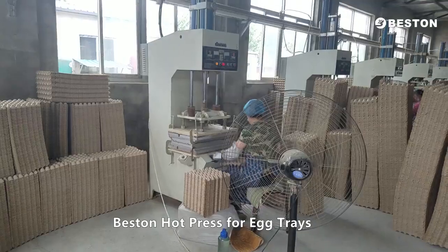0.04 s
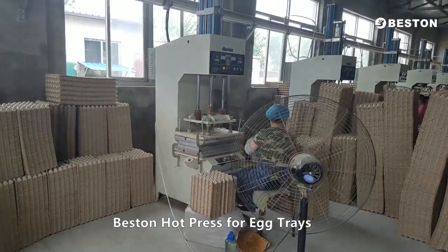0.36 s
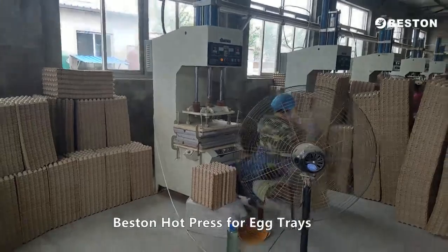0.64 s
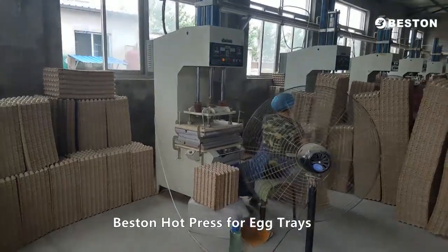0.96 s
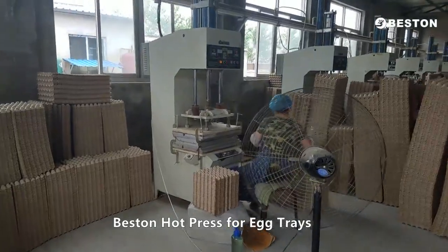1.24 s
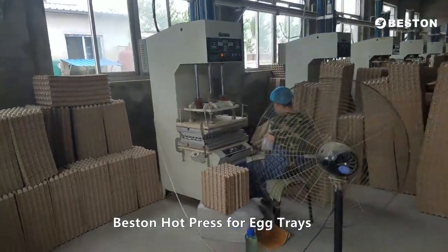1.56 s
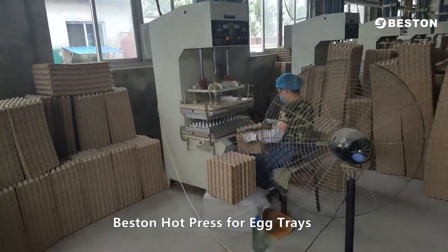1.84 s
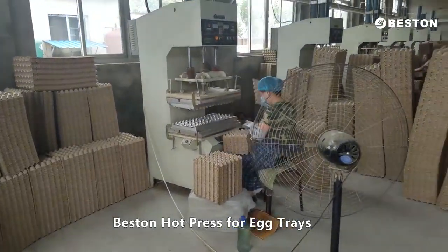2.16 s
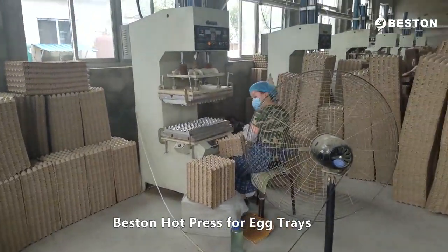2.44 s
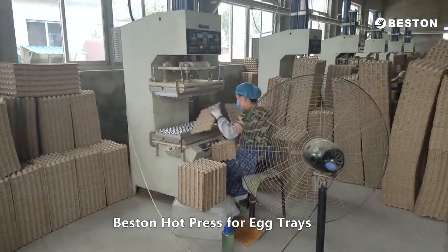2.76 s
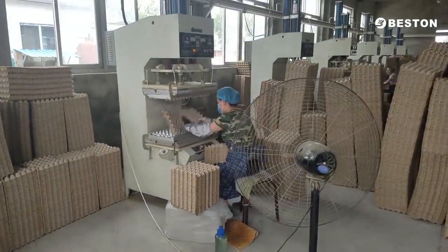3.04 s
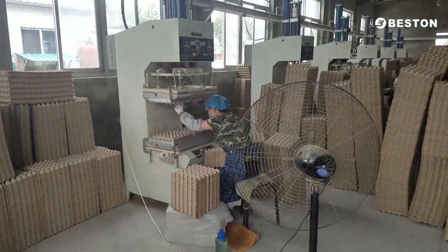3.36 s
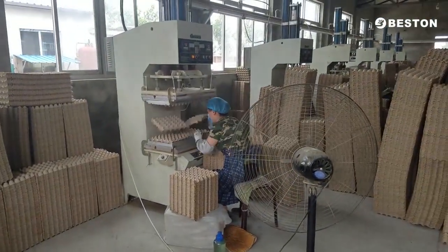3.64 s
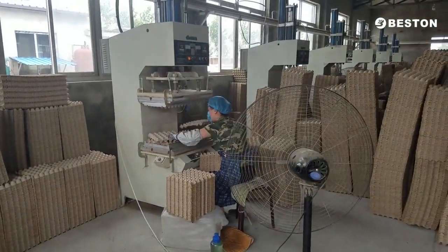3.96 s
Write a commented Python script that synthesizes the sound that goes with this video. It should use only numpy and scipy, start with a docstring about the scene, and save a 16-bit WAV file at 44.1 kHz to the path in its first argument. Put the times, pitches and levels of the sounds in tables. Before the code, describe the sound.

A pneumatic press lets out three loud hissing blasts of air, the later two whistling slightly. Its moulds thud and clunk now and then, blurred by a factory hall, over steady machinery rumble and a humming floor fan.

```python
"""A pneumatic hot press lets out three hissing blasts of air in a factory hall.
Each jet sags and dulls as its pressure drains; the outlet rings, and whistles where air catches an edge.
The press thuds and its moulds clunk now and then, blurred by the hall.
Underneath, machinery rumbles, motors and a large floor fan hum, and a draught puffs early on."""
import sys
import numpy as np
from scipy import signal
from scipy.fft import rfft, irfft
from scipy.io import wavfile

SR = 44100
rng = np.random.default_rng(int(sys.argv[2]) if len(sys.argv) > 2 else 0)


def output_pcm(signal):
    """Save a mono or channel-first signal as 16-bit PCM at the path in sys.argv[1].

    Samples are clipped to [-1, 1] before scaling.
    """
    pcm = np.clip(np.atleast_2d(signal).T, -1, 1) * 32767
    wavfile.write(sys.argv[1], SR, np.round(pcm).astype(np.int16))


N = 176400
TIME, FREQS = np.arange(N) / SR, np.maximum(np.arange(N // 2 + 1) * SR / N, 1)
CUTOFF_HZ = 15850


def from_db(db):
    """Decibels to gain."""
    return 10 ** (np.asarray(db) / 20)


def unit_power(x):
    """Scale to an RMS of one."""
    return x / np.sqrt(np.mean(x ** 2) + 1e-20)


def curve(points):
    """Join breakpoints into a curve over log frequency."""
    hz, values = np.transpose(points)
    return np.interp(np.log(FREQS), np.log(hz), values)


def drift(rate_hz):
    """A smooth random modulator of unit power."""
    return unit_power(irfft(rfft(rng.standard_normal(N)) / (1 + (FREQS / rate_hz) ** 2), N))


def swell(start, attack, end, decay):
    """Linear attack, hold, exponential tail."""
    return np.clip((TIME - start) / attack, 0, 1) * np.exp(-np.maximum(TIME - end, 0) / decay)


def arch(start, end):
    """A rounded fade in and out."""
    return np.sqrt(np.maximum(1 - (2 * (TIME - start) / (end - start) - 1) ** 2, 0))


def flutter(x, depth_db, rate_hz):
    """Each octave band wavers in level on its own."""
    spectrum, octave = rfft(x), np.clip(np.log2(FREQS / 80), 0, 7)
    bands = (irfft(spectrum * np.maximum(1 - abs(octave - k), 0), N) for k in range(8))
    return sum(band * from_db(depth_db * drift(rate_hz)) for band in bands)


def tone(hz, waver_hz, waver_db, rate_hz):
    """A sine of unit power that wanders in pitch and level."""
    phase = 2 * np.pi * np.cumsum(hz + waver_hz * drift(rate_hz)) / SR
    return unit_power(np.sin(phase) * from_db(waver_db * drift(rate_hz)))


# Stereo image of the hall. Each row: frequency in Hz, left-right correlation.
HALL_CORRELATION = [(60, 1), (200, 1), (380, 0.96), (700, 0.67), (1100, .28), (1650, -0.078), (2500, 0.18),
                    (3500, -0.061), (15000, 0.089)]


def hall_noise(colour_db):
    """Coloured stereo noise of unit power, centred in the bass and diffuse above."""
    mid, side = rfft(rng.standard_normal((2, N)))
    alike = np.clip(curve(HALL_CORRELATION), -.99, .99)
    stereo = np.sqrt(1 + alike) * mid + np.sqrt(1 - alike) * side * [[1], [-1]]
    return unit_power(irfft(stereo * from_db(colour_db) * (FREQS < CUTOFF_HZ), N))


# Air blasts. Each row: valve opening, closing and release in seconds, level in dB, then attack in
# seconds, sag in dB and sag time in seconds for the low rush, and the same three for the high sizzle.
AIR_BLASTS = [(0, 1.007, .08, -16, 0.23, 11, 1.17, 0.17, 13.5, 0.72),
              (0.971, 2.822, 0.086, -13.5, 0.1, 16.5, 2.72, 0.08, 15.5, 1),
              (3.207, 4.1, .07, -13.5, 0.05, 1, 0.26, 0.057, 6, 0.28)]
# EQ of each blast. Each row: frequency in Hz, relative level in dB.
FIRST_EQ = [(600, -21), (1000, -10.5), (1600, -7), (2100, -6.5), (3100, -4), (3700, -5.5), (4300, -9.5),
            (5400, -8.5), (6800, -11), (8200, -10), (9000, -17), (10000, -23.5), (11400, -18.5),
            (14000, -17.5), (15500, -20.5)]
SECOND_EQ = [(500, -15.5), (850, -9.5), (1200, -6.5), (1900, -4), (2400, -3), (3000, -4), (4300, -8.5),
             (6000, -8), (8000, -7.5), (9000, -17.5), (9800, -23.5), (11400, -14), (13200, -18.5),
             (15500, -15.5)]
THIRD_EQ = [(800, -17.5), (1150, -15), (1600, -5.5), (2400, -4.5), (3200, -2.5), (4500, -7), (5600, -6.5),
            (8100, -6), (9000, -11.5), (9900, -16), (11400, -13.5), (15500, -14)]
# Outlet resonances in each blast. Each row: centre in Hz, width in Hz, boost in dB.
FIRST_PEAKS = [(1550, 70, 4.5), (2435, 50, 9.5), (2990, 22, 11), (5490, 80, 0.5), (8040, 110, 3)]
SECOND_PEAKS = [(827, 29, 8), (885, 19, 4.6), (1457, 58, 5), (1660, 32, 3), (2370, 210, 2), (3820, 23, 4),
                (6170, 39, 5), (8160, 190, 2.2), (11500, 260, 3.3)]
THIRD_PEAKS = [(2390, 55, 5), (2520, 30, 6.4), (3870, 100, 5.2), (4400, 35, 7.3), (6060, 40, 4),
               (6430, 60, 7.5), (6900, 21, 8.3), (7140, 71, 3.6), (8100, 59, 7.2)]


def air_blast(blast, eq, peaks):
    """A turbulent jet rings the outlet; as the pressure drains, the sizzle sags faster than the rush."""
    opens, closes, release, level_db = blast[:4]
    crossover_hz, ripple_hz, ripple_db, surge_db = 3720, 9, 2.3, .3
    low_cut_db = 12 * np.maximum(np.log2(eq[0][0] / FREQS), 0)   # 12 dB per octave
    rings_db = sum(db / (1 + (2 * (FREQS - hz) / width) ** 2) for hz, width, db in peaks)
    # Nearby reflections put a fine ripple on each side's spectrum.
    ripple = np.array([np.interp(FREQS / ripple_hz, np.arange(N), bumps)
                       for bumps in rng.standard_normal((2, N))])
    jet = hall_noise(curve(eq) - low_cut_db + rings_db + ripple_db * ripple)
    rush = irfft(rfft(jet) / (1 + (FREQS / crossover_hz) ** 6), N)
    sizzle = jet - rush

    def pressure(attack, sag_db, sag_s):
        """The valve opens, the pressure drains, the valve shuts."""
        drained = 1 - np.exp(-np.maximum(TIME - opens - attack, 0) / sag_s)
        return swell(opens, attack, closes, release) * from_db(-sag_db * drained)

    rush = flutter(rush, depth_db=1.08, rate_hz=13)
    hiss = rush * pressure(*blast[4:7]) + sizzle * pressure(*blast[7:])
    return hiss * from_db(level_db + surge_db * drift(rate_hz=14))


# EQ of the machinery bed. Each row: frequency in Hz, relative level in dB.
MACHINERY_EQ = [(25, -20), (40, -33), (54, -7), (76, -9), (92, 2), (125, -1), (165, 1), (240, -2.5),
                (330, -2.5), (480, -7), (900, -2.5), (1500, -5), (2500, -2.5), (3500, -8.5), (5300, -17),
                (8000, -16.5), (9500, -30.5), (12300, -17.5), (15500, -21)]


def machinery():
    """Machines fill the hall with a restless rumble and a far hiss."""
    return from_db(-29.5) * flutter(hall_noise(curve(MACHINERY_EQ)), depth_db=2, rate_hz=9.1)


# Fan and motor hum. Each row: pitch in Hz, level in dB.
HUM_TONES = [(56, -51), (195, -46), (249, -44.5), (629, -51.5)]


def fan_hum():
    """The fan and motors hold low, slowly wavering tones."""
    return sum(from_db(db) * tone(hz, waver_hz=3.05, waver_db=3, rate_hz=6.05) for hz, db in HUM_TONES)


# Puffs of draught. Each row: start and end in seconds, level in dB.
DRAUGHT_PUFFS = [(.2, .95, -45), (0.648, 0.7, -44)]
# Their bassy EQ. Each row: frequency in Hz, relative level in dB.
DRAUGHT_EQ = [(30, -14), (55, -7), (95, 5), (160, -8), (300, -12), (600, -24), (1500, -50)]


def draught():
    """Moving air buffets each microphone port on its own."""
    white = rng.standard_normal((2, N))
    buffeting = unit_power(irfft(rfft(white) * from_db(curve(DRAUGHT_EQ)), N))
    return buffeting * sum(from_db(db) * arch(start, end) for start, end, db in DRAUGHT_PUFFS)


# Motor swells. Each row: start and end in seconds, level in dB, pitch in Hz.
MOTOR_SWELLS = [(0.49, 1.197, -45.5, 380), (.72, 1.01, -40, 245), (1.453, 2.904, -39, 195)]


def motor_drones():
    """Motor tones rise out of the bed and sink back."""
    return sum(from_db(db) * arch(start, end) * tone(hz, waver_hz=6.9, waver_db=1, rate_hz=19.9)
               for start, end, db, hz in MOTOR_SWELLS)


# Low press thuds and brighter mould clunks.
# Each row: start in seconds, level in dB, attack and decay in seconds.
PRESS_THUDS = [(.74, -34.5, 0.045, 0.53), (.965, -29.5, 0.0077, 0.039), (2.84, -32.5, 0.036, 0.35),
               (3.14, -39, 0.025, 0.04)]
MOULD_CLUNKS = [(2.065, -24, 0.012, 0.11), (2.6, -25, 0.0071, 0.12), (3.093, -26.5, .002, 0.092),
                (3.14, -27.5, .015, .05), (3.18, -28.5, 0.0066, 0.029), (3.775, -26, 0.0066, 0.083)]
# The body of each kind of hit. Each row: frequency in Hz, relative level in dB.
THUD_EQ = [(40, -22), (78, -16), (95, -4), (135, -9.5), (220, -11), (400, -25), (1000, -33)]
CLUNK_EQ = [(100, -14), (280, -4.5), (450, -5.5), (640, -2), (850, 0), (1500, -7), (2500, -13.5),
            (5000, -19), (12000, -38)]


def blows(hits, eq):
    """Blows on heavy parts, blurred by the hall into short bursts of dense ringing."""
    envelope = sum(from_db(db) * swell(start, attack, start + attack, decay)
                   for start, db, attack, decay in hits)
    return hall_noise(curve(eq)) * envelope


# Outlet whistles. Each row: start and end in seconds, level in dB, pitch and waver in Hz, roughness in dB.
JET_WHISTLES = [(1.29, 2.86, -36, 943.4, 12, 2), (1.2, 2.0, -31, 2373, 110, 6.5),
                (2.202, 2.87, -36.5, 2316, 63, 2), (3.317, 3.705, -36, 1216, 3.6, 5),
                (3.43, 3.58, -29.5, 1218, 5.8, 0), (3.732, 3.894, -32.5, 1200, 5.8, -1)]


def whistles():
    """The jet catches an edge and sings roughly for a while."""
    return sum(from_db(db) * arch(start, end) * tone(hz, waver_hz, rough_db, rate_hz=30)
               for start, end, db, hz, waver_hz, rough_db in JET_WHISTLES)


# Panning across the spectrum. Each row: frequency in Hz, left minus right in dB.
PAN_CURVE = [(500, -0.5), (1100, -1), (2200, -3), (4200, -5), (6000, -6), (7200, -10), (8000, -7.5),
             (9000, -1), (9900, -1.5), (11300, -1), (15500, -3)]


def scene():
    """The press and the hall around it, the treble leaning to the right."""
    eqs, peaks = (FIRST_EQ, SECOND_EQ, THIRD_EQ), (FIRST_PEAKS, SECOND_PEAKS, THIRD_PEAKS)
    mix = sum(map(air_blast, AIR_BLASTS, eqs, peaks)) + whistles()
    mix += blows(MOULD_CLUNKS, CLUNK_EQ) + blows(PRESS_THUDS, THUD_EQ)
    mix += machinery() + fan_hum() + motor_drones() + draught()
    pan = from_db(curve(PAN_CURVE) * [[.5], [-.5]])
    pan /= np.sqrt(np.mean(pan ** 2, axis=0))   # constant power
    return irfft(rfft(mix) * pan, N)


def record(dry):
    """After a moment of silence the sound cuts in and comes up to full level; the top is cut."""
    start_s, fade_s, fade_from_db = .0685, .1, -3
    fade = (TIME > start_s) * from_db(fade_from_db * np.clip(1 - (TIME - start_s) / fade_s, 0, 1))
    low_pass = signal.ellip(12, .1, 80, CUTOFF_HZ, fs=SR, output="sos")
    return signal.sosfilt(low_pass, dry * fade + 1e-18)


dry = scene()
out = record(dry)
output_pcm(out)
```